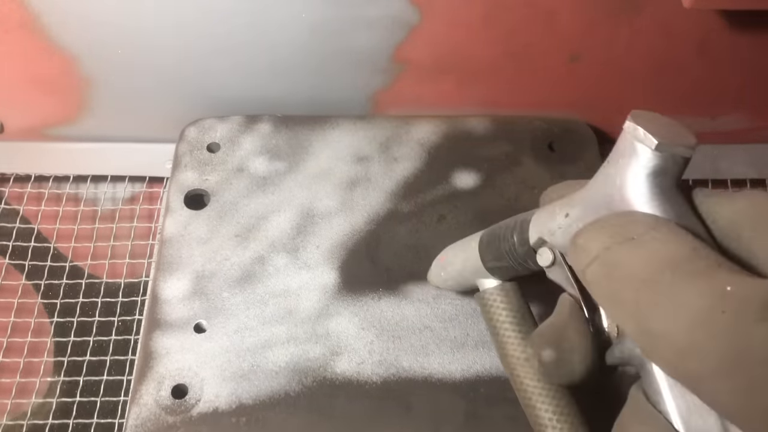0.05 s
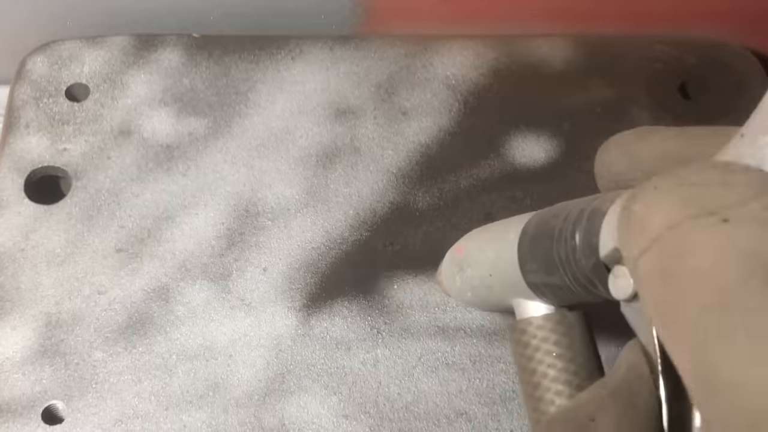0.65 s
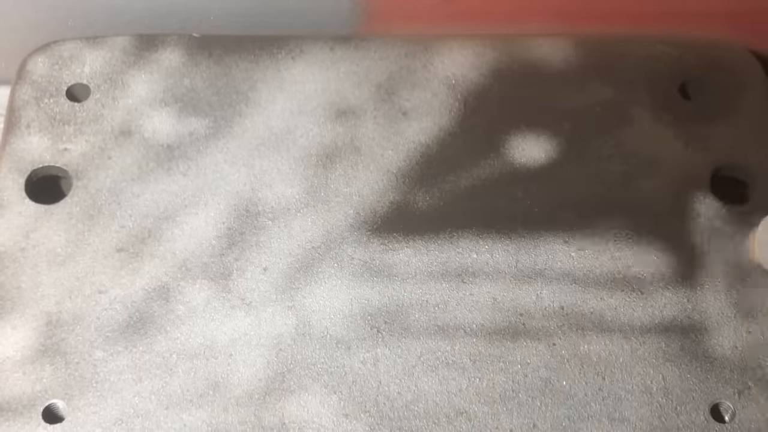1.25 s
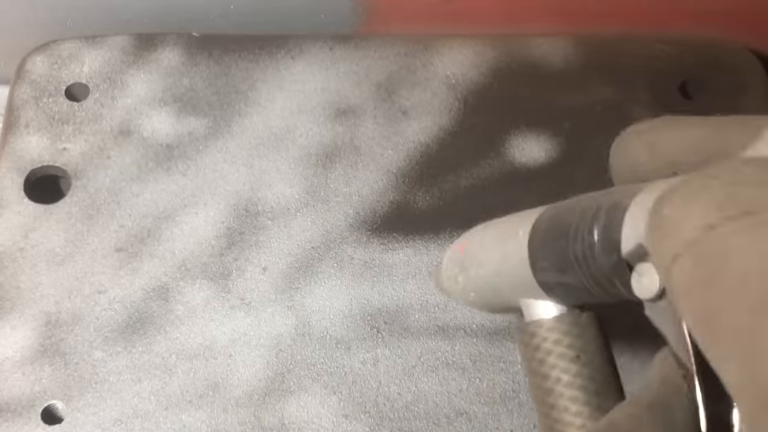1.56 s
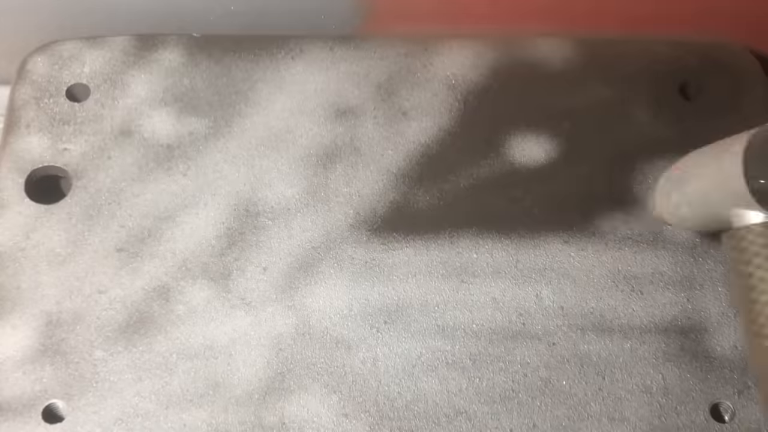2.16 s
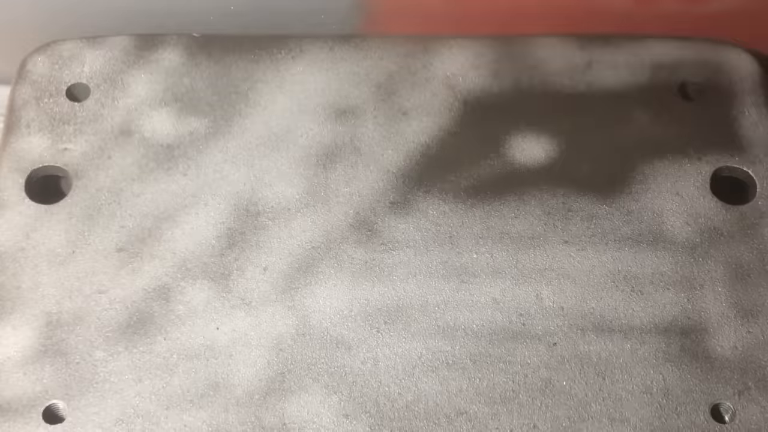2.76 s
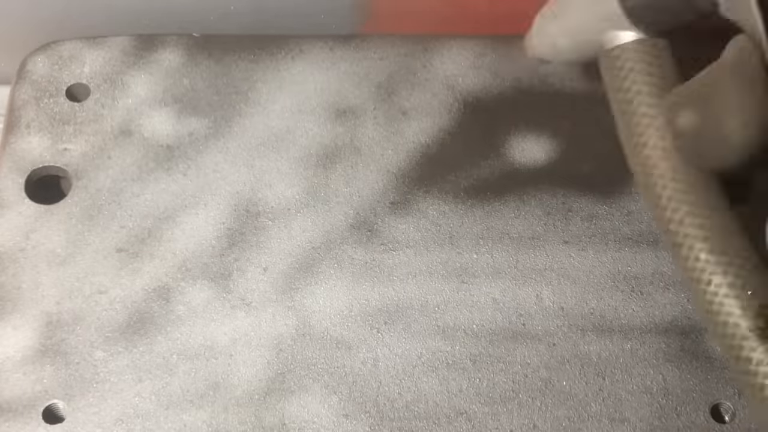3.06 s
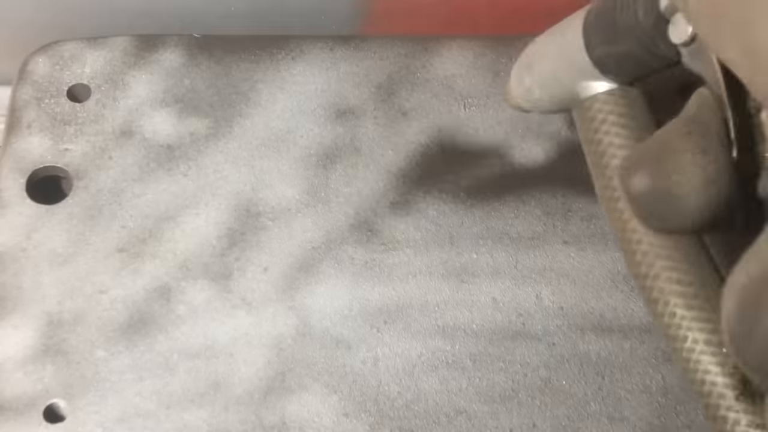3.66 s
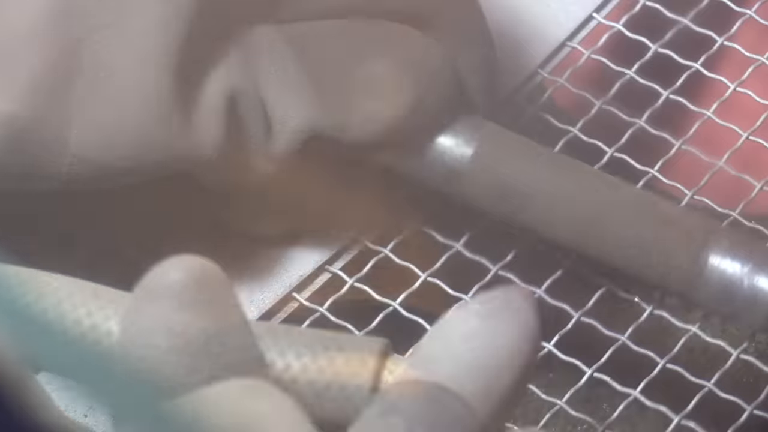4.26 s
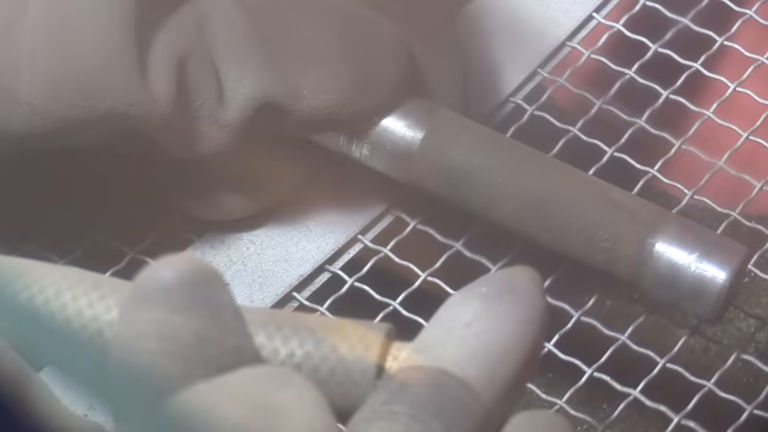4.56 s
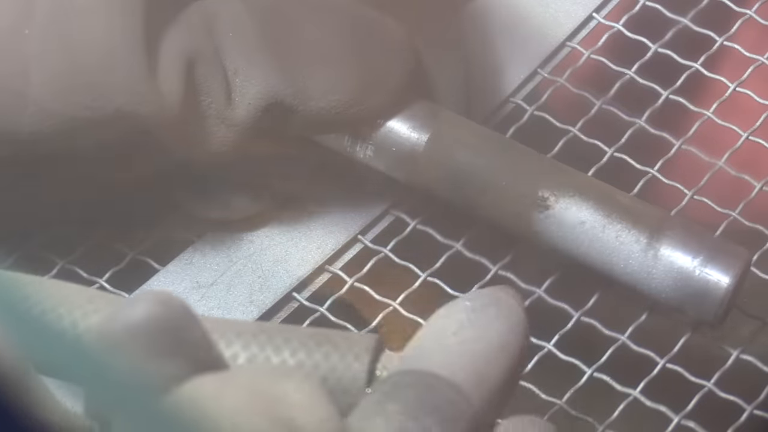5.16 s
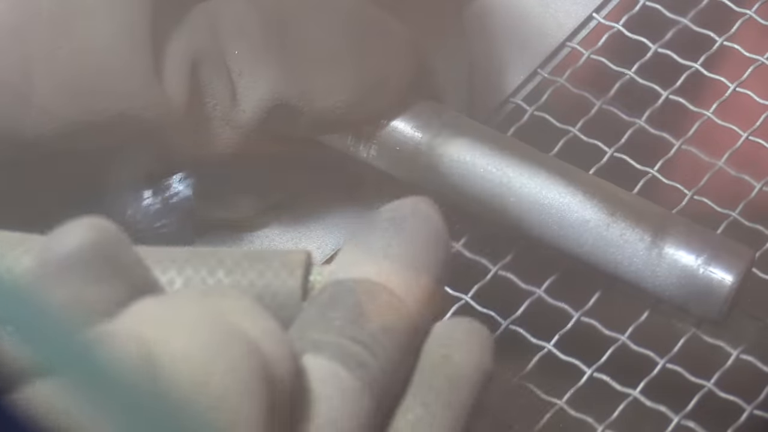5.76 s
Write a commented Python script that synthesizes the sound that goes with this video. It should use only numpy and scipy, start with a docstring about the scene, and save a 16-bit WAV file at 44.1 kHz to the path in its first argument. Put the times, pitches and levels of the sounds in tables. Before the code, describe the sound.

A sandblasting nozzle hisses without pause inside a steel cabinet. At first it is a thin hiss at arm's length, with a suction motor whining through it. At about 0.5 seconds the sound jumps close: a fuller, grainy hiss on a metal plate, with faint wavering high whistles and the motor underneath. From 1.8 seconds the hiss dips and slowly recovers, while the jet catches edges and bolt holes, giving short bright sprays, hollow roars and low gusts on the microphone. These cluster around 1.8 to 2 seconds and 2.4 to 3.5, with smaller ones near 4.

At about 4.3 seconds the sound changes abruptly to a steel tube being blasted. A loud, steady, shrill whistle sits over wider rushing air, with a higher fluttering screech and thin, very high tones. The gritty hiss strengthens at 4.8 seconds, and the screech falters briefly several times before the end, near 6 seconds.

```python
"""Sandblasting in a steel cabinet

Three scenes, joined by hard cuts. First a jet of air and grit hisses on a plate at arm's length, over
a whining suction motor. Then it sweeps the plate close up, spraying off edges and roaring in bolt holes
while spent air buffets the microphone. Last it blasts a steel tube and the air whistles shrilly."""
import sys
import numpy as np
from scipy import signal
from scipy.fft import rfft, irfft, next_fast_len
from scipy.io import wavfile

SR = 44100
rng = np.random.default_rng(int(sys.argv[2]) if len(sys.argv) > 2 else 0)


def int16_out(signal):
    """Quantize to a 16-bit WAV file."""
    q = np.round(np.clip(np.atleast_2d(signal).T, -1, 1) * 32767)
    wavfile.write(sys.argv[1], SR, q.astype(np.int16))


N = 256662
CLOSE_CUT_S, TUBE_CUT_S, CROSSFADE_S = .457, 4.26, .015

# Noise colours, ahead of any level ride: f/Hz, level/dB per Hz
PLATE_HISS = [(1800, -108), (3300, -88), (4000, -87), (5100, -89), (6000, -88.5), (6800, -90.5),
              (8100, -84.5), (9500, -87), (11200, -91), (13500, -91), (15500, -93)]  # the jet, close up
PLATE_ROAR = [(150, -108), (450, -90), (800, -88), (1200, -86.5), (1700, -88.5), (2300, -87), (2900, -93.5),
              (4000, -104)]  # its impact on the plate
EDGE_SPRAY = [(600, -104), (1300, -94), (3000, -94), (6500, -91), (9000, -88), (10300, -92.5),
              (11500, -90.5), (13000, -90), (15500, -102)]  # spray off an edge
HOLE_ROAR = [(300, -100), (800, -90), (1050, -81.5), (1300, -79), (1700, -87), (2200, -86), (3200, -97),
             (6000, -106)]  # hollow roar of a bolt hole
TUBE_GRIT = [(250, -135), (2000, -104), (3500, -87.5), (5500, -81.5), (7000, -84.5), (8200, -84),
             (9600, -95), (10500, -82.5), (12000, -88.5), (15500, -83)]  # grit on the steel tube
TUBE_RUSH = [(30, -131), (100, -125), (250, -112), (480, -104), (660, -93), (800, -82.5), (1000, -83),
             (1500, -83.5), (1950, -76.5), (2400, -80), (3050, -89), (3800, -84), (7000, -89),
             (15500, -87.5)]  # air rushing in the cabinet
FAR_HISS = [(30, -111), (200, -112), (450, -108), (850, -104), (1100, -100), (1550, -96), (2000, -86.5),
            (2700, -88), (3300, -91.5), (4600, -87), (6200, -94), (9500, -93.5), (12000, -93), (15500, -91)]  # the jet at arm's length
BUFFET = [(12, -88.5), (30, -91.5), (150, -88.5), (300, -90.5), (500, -95), (1000, -112)]  # spent air on the microphone
# Resonances that colour the noise: f/Hz, width/Hz, gain/dB
PLATE_RINGS = [(2970, 170, 1.5), (3550, 45, 5), (5290, 650, 4.5), (6870, 270, 1), (7640, 200, 4.5),
               (15190, 80, 9)]  # nozzle and plate
TUBE_RINGS = [(820, 70, 4), (1020, 45, -6), (1150, 70, 4), (1275, 90, 6), (2330, 70, 3), (3060, 100, -3),
              (4310, 70, 4), (5500, 150, 3), (6060, 200, 4), (6560, 50, 6), (6920, 50, 5), (7635, 50, 7),
              (8156, 60, 6), (10400, 70, 5), (10620, 80, 5), (11220, 120, 5), (11880, 50, 5),
              (12510, 120, 10), (15000, 100, 6)]  # cabinet and tube
# Stereo width of the noise: f/Hz, side over mid/dB
PLATE_WIDTH = [(2400, -60), (4400, -59), (15000, -43)]
TUBE_WIDTH = [(400, -20), (1300, -16), (2400, -6), (4400, -1), (8000, -3.5), (15000, 3)]

# Ride of the close jet; it drops as the gun swings past the rim, then creeps back: t/s, gain/dB
CLOSE_RIDE = [(.46, 0.35), (1.15, -0.26), (1.78, 0), (1.87, -5.5), (2.04, -6), (2.12, -4.5), (3.2, -3),
              (3.95, -1.5), (4.26, -1.5)]
# Rides at arm's length: t/s, jet gain/dB, nozzle whistle gain/dB
FAR_RIDE = [(0, 1, 2), (.15, -1, 2), (.29, 2, 4), (.37, 2, -1), (.45, -2, -7)]
# The jet meets an edge, a bolt hole or the rim: start/s, end/s, spray gain/dB, roar gain/dB, gust gain/dB
EDGES = [(1.29, 1.352, -3, -6.5, -23), (1.801, 1.871, 3.5, 0, 5), (1.881, 1.949, 4, -0.5, -5),
         (1.977, 2.018, 4, 1.5, -15), (2.392, 2.434, 4, -0.5, -1), (2.457, 3.166, -24, -9, -7.5),
         (2.73, 2.804, -12, -21, -2), (2.82, 2.9, -1.5, -13, 3), (3.191, 3.206, 2, -1, 4),
         (3.309, 3.498, -6.5, -6, -7), (3.986, 4.058, -2, -3, -3), (4.157, 4.193, -2, -4, -8)]

# Strength of the nozzle's whistle, close up: t/s, level/dB
NOZZLE_LEVEL = [(.46, -54), (1.15, -55.5), (1.79, -54), (1.87, -63), (2.25, -59.5), (2.6, -67), (3.15, -67),
                (3.6, -59.5), (4.26, -56.5)]
# Pitch line of the whistle in the gap between nozzle and plate: t/s, f/Hz
GAP_PITCH = [(0.47, 5430), (0.55, 5356), (0.7, 5370), (1.22, 5416), (1.33, 5464), (1.5, 5380), (1.66, 5491),
             (1.8, 5437), (2.12, 5460), (2.6, 5496), (2.75, 5620), (2.95, 5399), (3.2, 5512), (3.92, 5505),
             (4.09, 5600), (4.22, 5490)]
# Its weaker side modes: ratio to that pitch, level/dB, roughness 0-1
GAP_MODES = [(.499, -65.5, .25), (1.191, -68, .3), (1.505, -67, .5)]
# Tones at the plate, ahead of their rides: f/Hz, level/dB, roughness 0-1
CLOSE_TONES = [(1760, -71, .4), (10600, -71, .3), (14238, -64, .25)]  # air whistles
FAR_TONES = [(385, -82, .1), (470, -85, .3), (678, -76, .1), (958, -72, .1), (7738, -68.5, .15),
             (10505, -62, .1), (10945, -68, .8), (12710, -65.5, .2)]  # machine hum and air whistles
FAR_NOZZLE = [(3871, -59, 0)]  # the nozzle's own whistle
# Tones at the tube: settled f/Hz, base level/dB, roughness 0-1, left over right/dB
TUBE_TONES = [(404, -81, .1, 0), (808, -67, .4, 0), (3232, -67, .2, 0), (4393, -57, .1, -4),
              (4850, -66, .1, 0), (8534, -54, .08, 0), (8786, -62, .1, 0), (12222, -48.5, .06, -.5),
              (12858, -55, .3, 3), (13184, -49, .06, 3), (13208, -56, .5, 3), (13837, -47, .05, -3),
              (13863, -55.5, .5, -3), (14530, -63, .2, 0), (14826, -62, .2, 0), (15453, -49, .08, 6)]  # machine hum and air whistles; close pairs beat
SCREECH = [(5303, -44, .04, 2.6)]  # the jet's unsteady whistle
# Brief dropouts of the screech: t/s, half-length/s, depth/dB
SCREECH_BREAKS = [(5.004, .022, -14), (5.232, 0.055, -5.5), (5.512, 0.044, -13), (5.7, 0.023, -7)]

# Suction motor harmonics, ahead of any ride: multiple of the turning rate, level/dB
CLOSE_HARMONICS = [(2, -61), (4, -62.5), (5, -61), (7, -72), (9, -68.5), (11, -67), (12, -71), (14, -62.5),
                   (17, -61), (19, -66), (20, -67), (21, -68), (22, -72), (25, -73)]
FAR_HARMONICS = [(1, -78.5), (2, -62), (3, -81), (4, -64.5), (5, -63.5), (6, -76), (9, -64), (11, -66.5),
                 (14, -68), (17, -63), (19, -70), (20, -68), (21, -79), (22, -67.5), (24, -70)]


def close_plate():
    """The jet sweeps the plate; the hiss rides its level fully, the roar less, the motor whine more."""
    jet_db, = in_time(CLOSE_RIDE)
    gap = gap_whistle(jet_db)
    hiss = turbulence(PLATE_HISS, PLATE_WIDTH, PLATE_RINGS, flutter_db=.3, grit=.25, reflection=.09)
    roar = turbulence(PLATE_ROAR, PLATE_WIDTH, PLATE_RINGS, flutter_db=.56)
    tones = whistles(CLOSE_TONES, scatter_hz=38)
    turn_hz = 517.1 * (1 + .0001 * drift(1.28))
    whine = from_db(1.48 * jet_db) * motor(turn_hz, CLOSE_HARMONICS, rough=.025, scatter_hz=20)
    jet = from_db(jet_db) * (hiss + tones) + from_db(.73 * jet_db) * roar
    return jet + edge_bursts() + gap + nozzle_whistle() + whine_flare() + spent_air(jet_db) + whine


def tube():
    """Air whistles over the cabinet's rush; the grit steps up as the jet finds the tube."""
    start_hz, settled_hz = 1619.3, 1615.8  # the main whistle; the other tones sink in proportion
    whistle_hz = start_hz + (settled_hz - start_hz) * ramp(4.93, .36)
    pitch = whistle_hz / settled_hz * (1 + .0001 * drift(21))
    rush = turbulence(TUBE_RUSH, TUBE_WIDTH, TUBE_RINGS, flutter_db=.42, reflection=.1)
    grit = turbulence(TUBE_GRIT, TUBE_WIDTH, TUBE_RINGS, flutter_db=1.5, grit=.37, reflection=.18)
    grit_db = -8 + 5.5 * ramp(4.81, .04)
    whistle = tone(settled_hz * pitch, db=-35.5, rough=.0018, scatter_hz=25, left_lag_rad=.26)
    tones = panned_whistles(TUBE_TONES, pitch, scatter_hz=22)
    return whistle + screech(pitch) + tones + from_db(grit_db) * grit + rush


def far_plate():
    """The jet at arm's length: a thin hiss with the motor whining through it."""
    jet_db, nozzle_db = in_time(FAR_RIDE)
    hiss = turbulence(FAR_HISS, PLATE_WIDTH, flutter_db=-1.5, grit=.11, reflection=.23)
    tones = whistles(FAR_TONES, scatter_hz=18)
    nozzle = from_db(nozzle_db) * whistles(FAR_NOZZLE, scatter_hz=17)
    whine = motor(turn_hz=281.2, harmonics=FAR_HARMONICS, rough=.096, scatter_hz=18)
    return from_db(jet_db) * (hiss + tones) + nozzle + whine


def edge_bursts():
    """On an edge the jet splits: a bright spray, and a hollow roar from the hole."""
    spray_gain, roar_gain = np.zeros((2, N))
    for start, end, spray_db, roar_db, _ in EDGES:
        on_edge = ramp(start, .027) * (1 - ramp(end, .018))
        spray_gain += from_db(spray_db) * on_edge
        roar_gain += from_db(roar_db) * on_edge
    spray = spray_gain * turbulence(EDGE_SPRAY, PLATE_WIDTH, flutter_db=.7, grit=.15)
    roar = roar_gain * turbulence(HOLE_ROAR, PLATE_WIDTH, flutter_db=.25)
    return spray + roar


def screech(pitch):
    """The jet's unsteady whistle on the tube starts weak, catches, flutters and now and then breaks."""
    weak_db = -3.5 * (1 - ramp(4.57, .077))
    breaks_db = sum(depth_db * np.maximum(1 - np.abs(seconds() - at_s) / half_s, 0)
                    for at_s, half_s, depth_db in SCREECH_BREAKS)
    flutter_db = drift(21)
    return from_db(weak_db + breaks_db + flutter_db) * panned_whistles(SCREECH, pitch, scatter_hz=25)


def gap_whistle(jet_db):
    """This whistle wavers with the nozzle-to-plate gap, rides the jet and trembles with the hand."""
    hz = in_time(GAP_PITCH)[0] + 5 * drift(3.9)
    db = -56.5 + 1.7 * jet_db + .9 * drift(2.8)
    return tone(hz, db, rough=.04, scatter_hz=28) + whistles(GAP_MODES, scatter_hz=28.2, pitch=hz)


def nozzle_whistle():
    """The nozzle's own high whistle, sagging slowly in pitch."""
    db, = in_time(NOZZLE_LEVEL)
    hz = 7124 - 6.5 * (seconds() - CLOSE_CUT_S)
    return tone(hz, db, rough=.017, scatter_hz=22)


def whine_flare():
    """The motor's whine flares briefly on its fifth harmonic as the jet lands on the plate."""
    swell = ramp(.49, .068) * (1 - ramp(.55, .068))
    return swell * tone(hz=2588, db=-56, rough=.1, scatter_hz=20)


def spent_air(jet_db):
    """Air buffets the microphone: a draught that follows the jet, and a gust thrown back by each edge."""
    rise_s, linger_s, fall_s = .05, .025, .087
    draught = from_db(-.5 + .7 * jet_db)
    gusts = sum(from_db(gust_db) * ramp(start, rise_s) * (1 - ramp(end + linger_s, fall_s))
                for start, end, _, _, gust_db in EDGES)
    return (draught + gusts) * turbulence(BUFFET, PLATE_WIDTH, flutter_db=1.1)


def motor(turn_hz, harmonics, rough, scatter_hz):
    """The suction motor whines on multiples of its turning rate."""
    return sum(tone(multiple * turn_hz, db, rough, scatter_hz) for multiple, db in harmonics)


def cabinet(hz, reflection):
    """Echoes between the steel walls comb the spectrum, at unity power gain."""
    delays_s = rng.uniform(.002, .016, size=6)
    comb = np.abs(1 + reflection * np.exp(-2j * np.pi * np.outer(delays_s, hz)).sum(axis=0))
    return comb / np.sqrt(np.mean(comb ** 2))


def turbulence(spectrum, width, rings=(), flutter_db=0., grit=0., reflection=0.):
    """Stereo flow noise, coloured by spectrum and rings; grit is the share of sharp grain impacts."""
    hz = np.arange(1, SR / 2, 4)
    gain = from_db(at_hz(spectrum, hz)) * cabinet(hz, reflection) * np.sqrt(SR / 2)
    for centre_hz, width_hz, db in rings:
        bell = 1 / (1 + (2 * (hz - centre_hz) / width_hz) ** 2) ** 2
        gain *= np.sqrt(1 + (from_db(db) ** 2 - 1) * bell)
    grains = (rng.random(N) < 2500 / SR) * rng.standard_normal(N)  # about 2500 impacts a second
    air, side_air = rng.standard_normal((2, N))
    gritty_air = np.sqrt(1 - grit) * air + np.sqrt(grit) * grains / np.std(grains)
    size = next_fast_len(N)
    bins = np.fft.rfftfreq(size, 1 / SR)
    mid = rfft(gritty_air, size) * np.interp(bins, hz, gain)
    side = rfft(side_air, size) * np.interp(bins, hz, gain * from_db(at_hz(width, hz)))
    return irfft([mid + side, mid - side], size)[:, :N] * from_db(flutter_db * drift(4.5))


def whistles(rows, scatter_hz, pitch=1):
    """A stack of air tones, steady or tied to one shared pitch."""
    return sum(tone(hz * pitch, db, rough, scatter_hz) for hz, db, rough in rows)


def panned_whistles(rows, pitch, scatter_hz):
    """Standing waves give each tone its own left-right balance."""
    return sum(tone(hz * pitch, db, rough, scatter_hz) * from_db([[pan_db / 2], [-pan_db / 2]])
               for hz, db, rough, pan_db in rows)


def tone(hz, db, rough, scatter_hz, left_lag_rad=None):
    """A breathy sine: turbulent air scatters the share `rough` of its power into a narrow band."""
    cycles = np.cumsum(hz * np.ones(N)) / SR + rng.random()
    phase = 2 * np.pi * (cycles % 1)
    if left_lag_rad is not None:
        phase = np.array([phase - left_lag_rad, phase])
    in_phase = np.sqrt(2 * (1 - rough)) + np.sqrt(rough) * drift(scatter_hz)
    quadrature = np.sqrt(rough) * drift(scatter_hz)
    return from_db(db) * (in_phase * np.cos(phase) + quadrature * np.sin(phase))


def drift(rate_hz):
    """Smooth random modulation with a spread of 1."""
    hop, run_in = 40, 2000
    pole = np.exp(-2 * np.pi * hop * rate_hz / SR)
    noise = rng.standard_normal(N // hop + run_in + 2)
    slow = signal.lfilter([1], [1, -2 * pole, pole * pole], noise)[run_in:]
    return np.interp(np.arange(N) / hop, np.arange(len(slow)), slow / np.std(slow))


def ramp(at_s, length_s):
    """A linear fade from 0 to 1, centred on a moment."""
    return np.clip((seconds() - at_s) / length_s + .5, 0, 1)


def in_time(rows):
    """Each column of a breakpoint curve, at every sample."""
    times, *columns = np.transpose(rows)
    return [np.interp(seconds(), times, column) for column in columns]


def at_hz(points, hz):
    """A spectrum read on a log-frequency axis."""
    f, value = np.transpose(points)
    return np.interp(np.log(hz), np.log(f), value)


def from_db(db):
    """Decibels to gain."""
    return 10 ** (np.asarray(db) / 20)


def seconds():
    """Time of every sample."""
    return np.arange(N) / SR


def scene():
    """Far plate, close plate, tube: hard cuts with very short crossfades."""
    to_close, to_tube = ramp(CLOSE_CUT_S, CROSSFADE_S), ramp(TUBE_CUT_S, CROSSFADE_S)
    far = np.sqrt(1 - to_close) * far_plate()
    close = np.sqrt(to_close * (1 - to_tube)) * close_plate()
    return far + close + to_tube * tube()


def record(dry):
    """A steep low-pass shaves off the very top."""
    cutoff_hz = 15750
    return signal.sosfilt(signal.ellip(12, .1, 80, cutoff_hz, fs=SR, output="sos"), dry)


dry = scene()
out = record(dry)
int16_out(out)
```